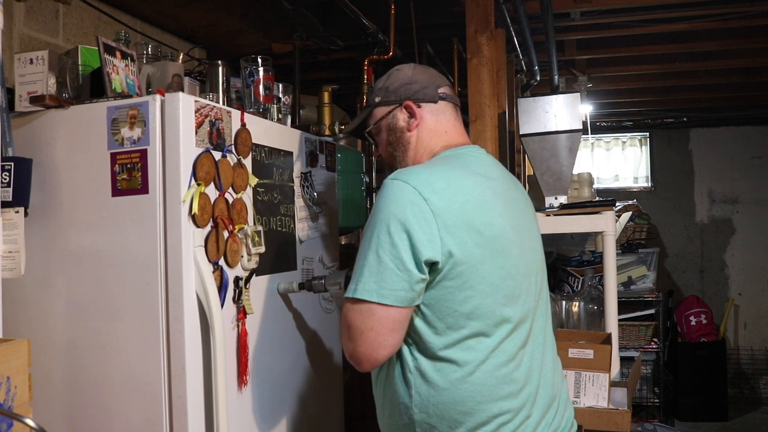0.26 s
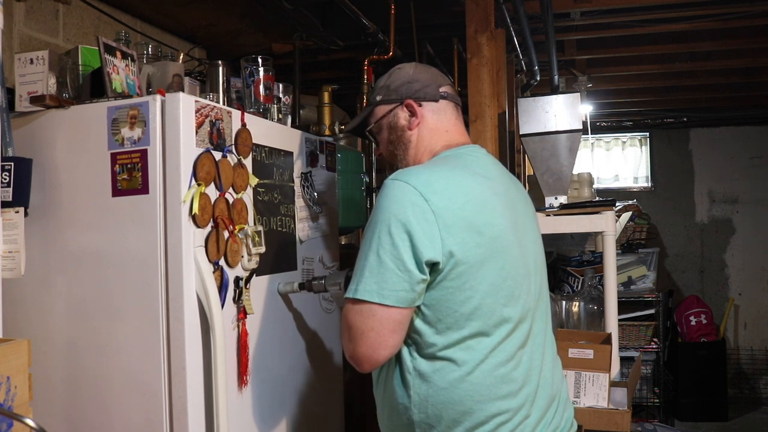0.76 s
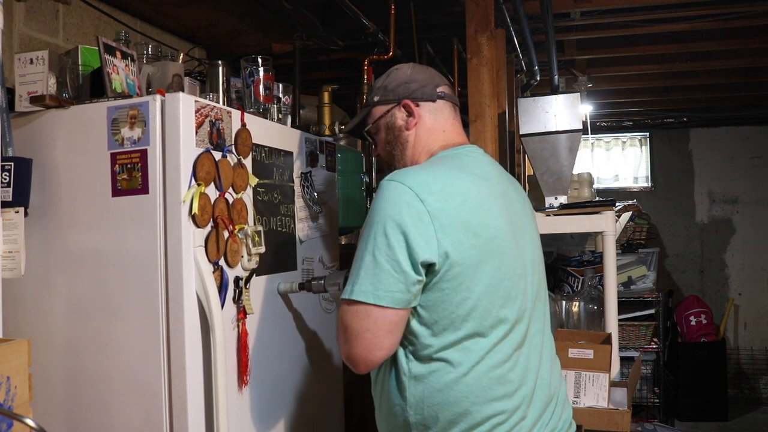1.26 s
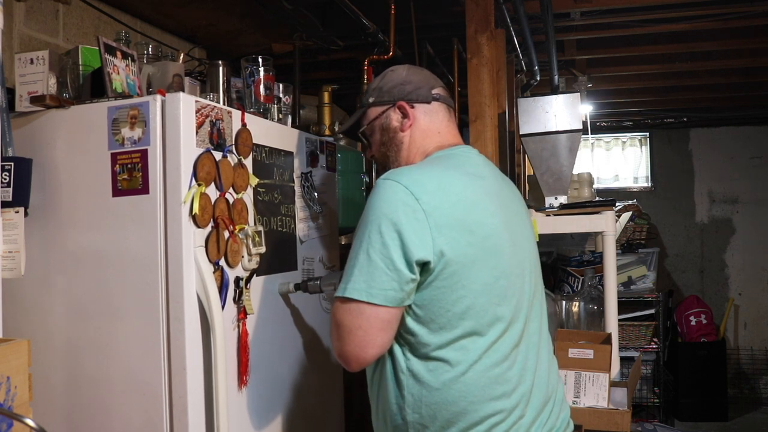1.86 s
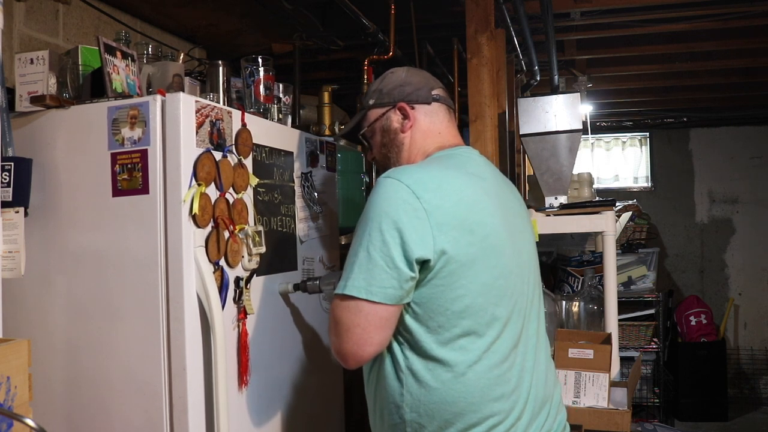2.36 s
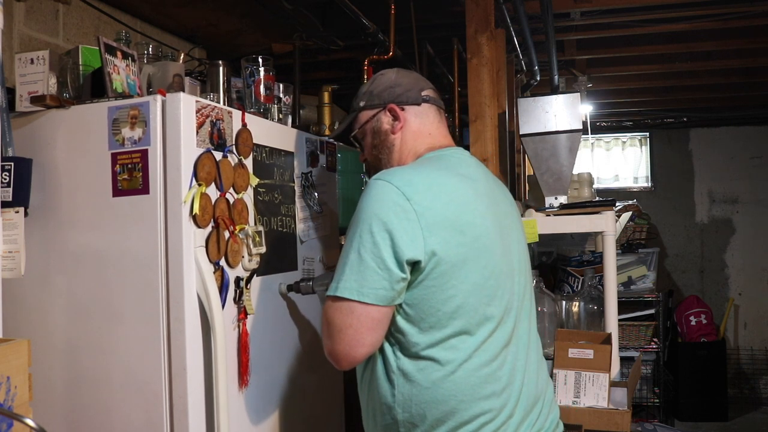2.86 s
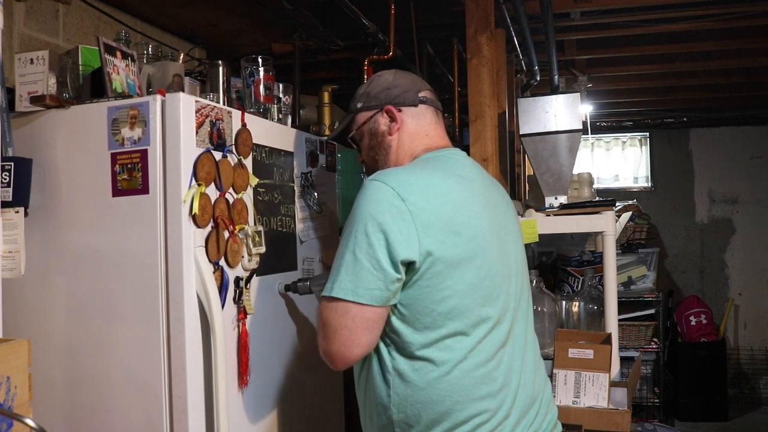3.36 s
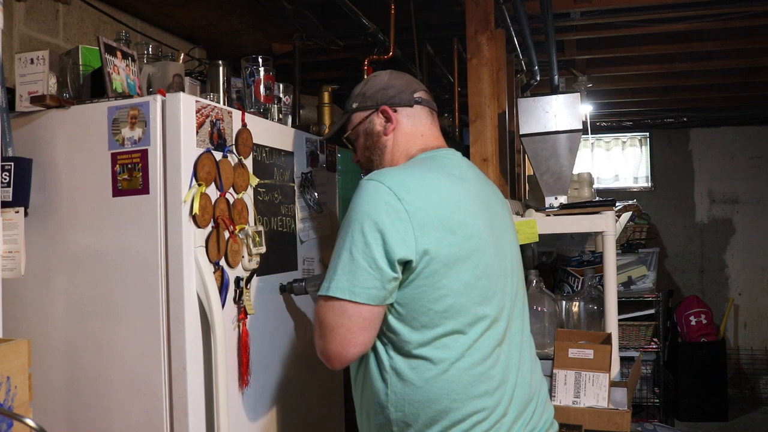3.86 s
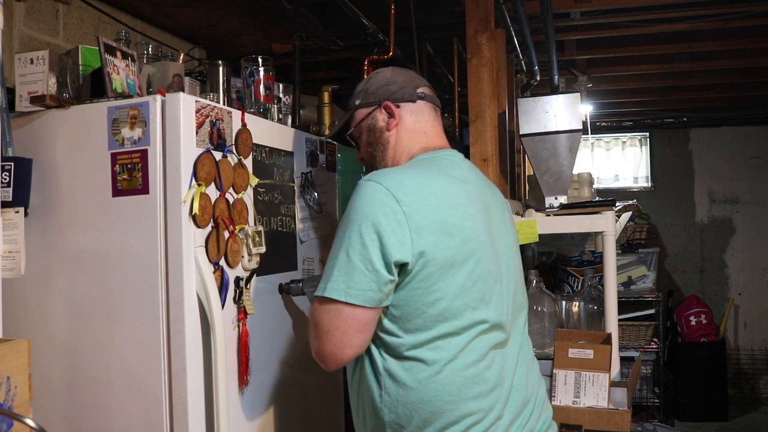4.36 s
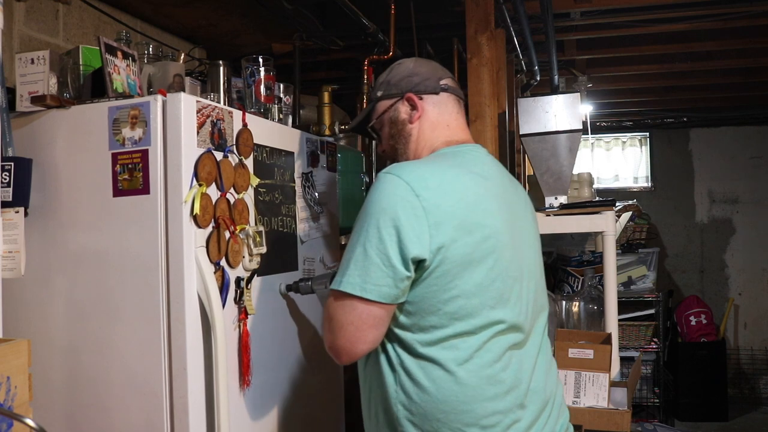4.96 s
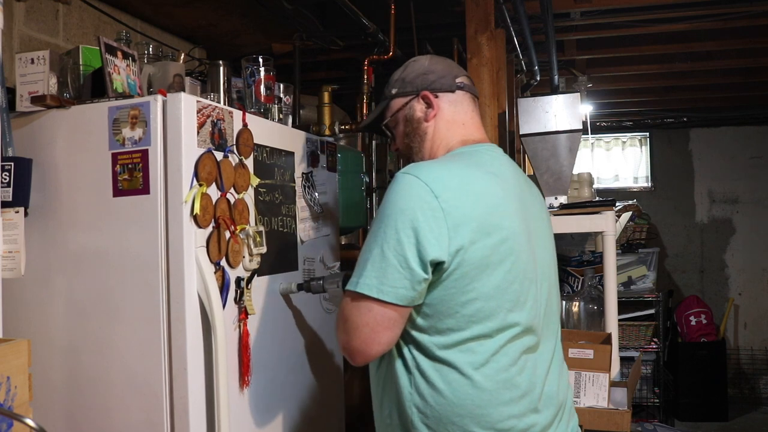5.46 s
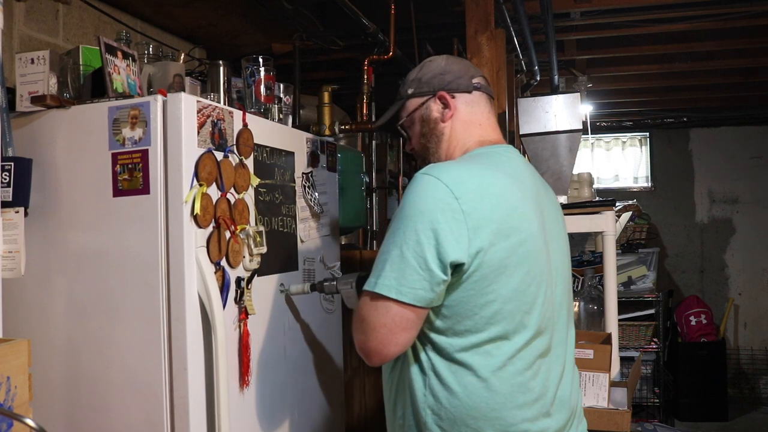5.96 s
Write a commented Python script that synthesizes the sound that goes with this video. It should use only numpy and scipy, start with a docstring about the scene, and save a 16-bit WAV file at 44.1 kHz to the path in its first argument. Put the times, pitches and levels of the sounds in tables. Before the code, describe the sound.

Quiet, dull basement room tone lies under a fairly close mono pickup with a short hard-wall tail. From 0 to 1.75 s a power drill labours on partial trigger: a rough, buzzing whine near 1.6 to 1.8 kHz, unsteady in pitch, with raspy tooth scrape and low cabinet rumble. Small catches knock at 0.6 and 0.9 s. At 1.8 s the pitch sags and the teeth snag with a sharp steel crack and thump. The motor then races up to about 2.6 kHz by 2.4 s, with brief squeals and groans; the door skin rings hollowly and the saw cup sings harshly near 4 to 5 kHz, loudest around 2.2 to 2.7 s. Grinding continues in uneven bites, with bright overtone flares near 3.4 and 3.7 s, then grows lighter. At 5.1 s the trigger releases: a whistling whine glides down, with soft squeaks and a final scraping catch near 5.7 s, fading to 6.2 s.

```python
"""In a basement a power drill pushes a hole saw into the sheet-steel door of a refrigerator.
First the motor, summed from a tone and its overtones, labours until catching teeth jerk the door.
From 1.8 s it speeds up; noise chips ring the door skin and saw cup, which sings, and grind ever lighter.
At 5.1 s the trigger is let go: gliding tones groan and squeak in the groove as the pitch coasts down.
Coloured noise is the room tone; every tool sound gets a short wall tail on its way to the microphone."""
import sys
import numpy as np
from scipy import signal
from scipy.fft import rfft, irfft
from scipy.io import wavfile
from scipy.ndimage import uniform_filter1d, map_coordinates

SR = 44100
rng = np.random.default_rng(int(sys.argv[2]) if len(sys.argv) > 2 else 0)


def persist_wave(psi):
    """Save psi, clipped to +-1, as 16-bit WAV."""
    counts = np.round(np.clip(psi, -1, 1) * 32767).astype(np.int16)
    wavfile.write(sys.argv[1], SR, np.atleast_2d(counts).T)


N = 273417
T = np.arange(N) / SR
TOP_HZ = 15650  # highest pitch that reaches the microphone
RELEASE_S = 5.1  # trigger let go


def undb(db):
    """Decibels to gain."""
    return 10 ** (np.asarray(db) / 20)


def unit(x):
    """Scale to rms 1."""
    return x / np.sqrt(np.mean(x ** 2))


def curves(*tables):
    """Join tables in time and give each column at every sample."""
    s, *columns = np.vstack(tables).T
    return [np.interp(T, s, c) for c in columns]


def swells(table):
    """Smooth bumps from rows (centre s, length s, dB, ..); one level curve per dB column."""
    return sum(np.outer(lifts, np.exp(-(2 * (T - s) / length) ** 2)) for s, length, *lifts in table)


def gain_at(hz, points):
    """Gain of a (Hz, dB) spectrum, straight between points on a log frequency scale."""
    f, db = np.transpose(points)
    return undb(np.interp(np.log(hz + 1), np.log(f), db))


def colour(x, points):
    """Filter by a broad (Hz, dB) spectrum and scale to rms 1."""
    gain = gain_at(np.fft.rfftfreq(N, 1 / SR), points)
    return unit(irfft(rfft(x) * gain, N))


def ring(x, modes):
    """Drive resonances (Hz, width Hz, dB) of alternating sign and scale to rms 1."""
    out = 0
    for k, (hz, width, db) in enumerate(modes):
        mode = signal.lfilter(*signal.iirpeak(hz, hz / width, SR), x)
        out = out + (-1) ** k * undb(db) * mode
    return unit(out)


def walk(rate):
    """Smooth random motion with spread 1, through `rate` random points per second."""
    return unit(map_coordinates(rng.standard_normal(8192), [T * rate], order=2, mode="wrap"))


def catches(rate, decay_s):
    """Random bites that start at once and ease off; mean 0, spread 1."""
    kicks = (rng.random(N) < rate / SR) * rng.random(N)
    force = signal.lfilter([1], [1, -np.exp(-1 / (decay_s * SR))], kicks)
    return unit(force - force.mean())


def waver(x, share, rate):
    """Bend the pitch of a ring at random, by a share of its frequency."""
    bend = share * walk(rate)
    lag = signal.lfilter([1], [1, -np.exp(-1 / SR)], bend)
    return map_coordinates(x, [T * SR + lag], order=3, mode="mirror")


def basement(x, wet_db):
    """Direct sound and a short diffuse tail from the walls; the treble dies first."""
    t60_s, treble_t60_s = 0.31, 0.22
    t = T[:SR // 2]
    noise = rng.standard_normal(len(t))
    low = signal.sosfilt(signal.butter(2, 3500, fs=SR, output="sos"), noise)
    tail = low * undb(-60 * t / t60_s) + (noise - low) * undb(-60 * t / treble_t60_s)
    tail *= t > .003  # the walls answer after 3 ms
    wet = signal.fftconvolve(x, tail / np.linalg.norm(tail))[:N]
    return (x + undb(wet_db) * wet) / np.hypot(1, undb(wet_db))


# Steady background of the basement. Each row: frequency in Hz, relative level in dB.
ROOM_TONE_SPECTRUM = [(25, -57), (160, -25), (195, -25), (235, -0.5), (310, -9), (400, 4), (560, -0.5),
                      (620, 1.5), (665, 12), (740, -1.5), (1200, -4), (2400, -2.5), (4000, -7),
                      (15000, -30)]


def room_tone():
    """Coloured noise of the basement air, its level wandering slowly."""
    level_db = -55 + 0.99 * walk(7.3)
    return undb(level_db) * colour(rng.standard_normal(N), ROOM_TONE_SPECTRUM)


# Stick-slip squeals at the door. Each row: start in seconds, length in seconds until the fade,
# start pitch in Hz, end pitch in Hz, relative level in dB, overtone slope in dB per octave,
# roughness (0 pure, 1 ragged, 2 a scrape).
GROOVE_SQUEALS = [(0.622, 0.017, 2220, 2190, -41, -24, 0.87), (1.935, 0.027, 2085, 2152, -29, -14, 0.3),
                  (1.962, 0.077, 671, 668, -39, -39, 1.3), (2.105, 0.036, 682, 735, -36.5, -29, 1.13),
                  (2.172, 0.07, 696.5, 693, -39, -29, 0.9), (2.17, 0.068, 2730, 2654, -40.5, -25, 0.49),
                  (2.24, 0.13, 970, 1100, -39.5, -11, 2.05), (2.324, 0.026, 4114, 3994, -45, -25, 0.38),
                  (2.345, 0.02, 4670, 4800, -35, -25, 0.2), (2.483, 0.03, 7030, 7100, -49, -25, 0.1),
                  (3.42, 0.46, 2150, 2170, -54.5, -28, 0.29), (4.065, 0.1, 803, 836.5, -42.5, -26, 1.02),
                  (4.705, 0.027, 2663, 2710, -40.5, -14, 0.2), (5.17, 0.12, 1553, 1540, -55.5, -25, 1.7),
                  (5.304, 0.0407, 1122, 1086, -47.5, -32, 0.74), (5.452, 0.03, 642, 667, -50, -32, 0.7),
                  (5.53, 0.035, 682, 667, -51.5, -32, 0.68), (5.563, 0.049, 674.4, 645, -42, -37, 0.75),
                  (5.66, 0.019, 2057, 2002, -38, -11, 0.62), (5.682, 0.0053, 2168, 2197, -41, -5, 0.37),
                  (5.692, 0.0064, 2010, 2032, -36.5, -11, 0.29), (5.68, 0.028, 2016, 1983, -49, -1.5, 0.25)]


def squeals(build_cycles=3, flutter_db=4):
    """The saw wall sticks and slips in its groove: gliding tones whose pitch and level turn ragged."""
    wander_share = 0.045  # pitch wander at roughness 1
    out = np.zeros(N)
    for s, length, start_hz, end_hz, db, step_db, rough in GROOVE_SQUEALS:
        # a resonance needs a few cycles to build up and to die, so low squeals start softly
        edge = build_cycles / start_hz
        span = (T > s) & (T < s + length + edge)
        t = T[span] - s
        glide_hz = np.interp(t, [0, length], [start_hz, end_hz])
        hz = glide_hz * (1 + wander_share * rough * walk(500)[span])
        phase = 2 * np.pi * np.cumsum(hz) / SR
        harmonics = [k for k in range(1, 7) if k * start_hz < TOP_HZ]
        tone = sum(undb(step_db * np.log2(k)) * np.sin(k * phase) for k in harmonics)
        flutter = undb(flutter_db * rough * np.tanh(walk(170)[span]))
        gate = np.clip(np.minimum(t, length + edge - t) / edge, 0, 1)
        out[span] += undb(db) * gate * unit(tone * flutter)
    return out


# Teeth catching the steel. Each row: start in seconds, relative thump level in dB,
# relative crack level in dB, time to fall by 60 dB in seconds.
TOOTH_SNAGS = [(0.622, -44.5, -57, 0.082), (0.91, -49, -50, 0.1), (1.784, -36.5, -53, 0.15),
               (1.789, -42, -25, 0.032), (1.806, -44, -41, 0.079), (5.445, -61, -59, 0.14),
               (5.675, -64, -51, 0.16)]


def snags():
    """A caught tooth jerks the door: a crack from the steel and a thump from the cabinet."""
    thump, crack = np.zeros(N), np.zeros(N)
    for s, thump_db, crack_db, decay in TOOTH_SNAGS:
        attack = np.clip((T - s) / 0.00056, 0, 1)
        fade = attack * np.exp(-np.log(1000) * np.abs(T - s) / decay)
        thump += undb(thump_db) * fade
        crack += undb(crack_db) * fade
    cabinet_modes = [(118, 67, -2.0), (164, 14, 11.5), (285.0, 230, 11.0)]
    steel_modes = [(1300.0, 31, 20.0), (2640, 190, 17), (5870, 140, 10),
                   (6760, 53, 8), (10900, 2000, -12.5)]
    low = ring(rng.standard_normal(N), cabinet_modes)
    high = ring(rng.standard_normal(N), steel_modes)
    return thump * low + crack * high


def teeth(hz, wobble_db, bite_db, catch_db, grain_db):
    """Tiny chips tear off in a dense crackle that pulses with the uneven rim and the passing teeth."""
    phase = 2 * np.pi * np.cumsum(hz) / SR
    rim = np.sin(phase / 70 + walk(10)) + np.sin(phase / 35 + walk(10))
    passing = np.sin(phase / 7 + walk(25))
    caught = np.minimum(catches(110, 0.033), 2.5)
    force_db = wobble_db * rim + bite_db * passing + catch_db * caught
    return rng.standard_normal(N) * undb(force_db + grain_db * rng.standard_normal(N))


# The saw judders with the catching teeth, harder the more the door rings.
# Each row: door ring in dB as given to the saw, judder in dB per unit of catching force.
JUDDER_DEPTH = [(-58.5, 0.6), (-45, 2.0)]


def judder(door_db):
    """Level jolts in dB as the whole saw judders with its catching teeth."""
    return np.interp(door_db, *np.transpose(JUDDER_DEPTH)) * np.minimum(catches(60, 0.013), 2.2)


# Resonances of the door skin. Each row: frequency in Hz, width in Hz, relative level in dB.
DOOR_MODES = [(379, 31, -7.5), (474, 34, -5), (656, 200, -5.5), (760, 62, 2.5), (805, 28.3, 7.5),
              (850, 55, 4), (952, 68, 1), (1079.4, 66, 3.5)]


def door_ring(hz):
    """The teeth drive the resonances of the door skin."""
    door = ring(teeth(hz, wobble_db=1.0, bite_db=-1.0, catch_db=0.33, grain_db=1.5), DOOR_MODES)
    return colour(door, [(100, -7), (350, 1.0), (1120, 1.0), (1500, 13.5), (5000, -49)])


# Broad colour of the tooth scrape. Each row: frequency in Hz, relative level in dB.
SCRAPE_SPECTRUM = [(300, -38), (900, -22), (1350, 0), (2200, 6), (3300, 3), (4500, 3), (6200, 2),
                   (8000, -9.5), (9300, -15), (10800, -26), (13000, -15.5), (15500, -76)]
# Resonances of the saw cup. Each row: frequency in Hz, width in Hz, relative level in dB.
CUP_RESONANCES = [(2126, 29, 5.5), (2680, 55, 18.5), (4190, 630, -10.5), (4490, 270, 12), (5400, 2200, -21),
                  (6900, 62, -19), (10200, 993, 0), (11550, 930, -1)]


def tooth_scrape(chips):
    """Chips hiss over a broad band, ring the saw cup and drag."""
    # the cup rings most while the whole rim is in the steel
    rim_db = np.interp(T, [1.8, 2.2, 5.8], [-3, 7.5, 5])
    # at low speed the teeth drag instead of cutting, with a duller rasp
    drag_db = np.interp(T, [1.6, 2.2], [5, -12])
    hiss = undb(9.0) * colour(chips, SCRAPE_SPECTRUM)
    cup = undb(rim_db) * ring(chips, CUP_RESONANCES)
    drag = undb(drag_db) * ring(chips, [(2227, 87, 0)])
    return hiss + cup + drag


def singing_gain():
    """The cup sings as the rim first sinks in: attack, hold, a quick drop and a slow fade."""
    start_s, attack_s, end_s, release_s = 1.97, 0.11, 2.67, 0.037
    level_db, drop_db, fade_db_per_s = -45, -4, 11.5
    after = np.maximum(T - end_s, 0)
    db = level_db + drop_db * np.minimum(after / release_s, 1) - fade_db_per_s * after
    return np.clip((T - start_s) / attack_s, 0, 1) * undb(db)


# Sharp modes of the singing saw cup. Each row: frequency in Hz, width in Hz, relative level in dB.
SINGING_MODES = [(4146, 134, -3.5), (4660, 78, 5), (4758, 53, 1.5)]


def cup_singing(chips, sing_db):
    """The rim grabs and slips: the cup sings in gritty bursts, bent in pitch by the grip."""
    grip = unit(undb(5.5 * np.minimum(walk(75), 1.2)))
    tone = waver(ring(chips, SINGING_MODES), share=0.01102, rate=55)
    return singing_gain() * undb(sing_db) * grip * tone


# Broad colour of the cabinet rumble. Each row: frequency in Hz, relative level in dB.
RUMBLE_SPECTRUM = [(25, -52), (45, -30), (75, -8), (120, -3), (160, 4), (230, 8.5), (330, -0.5),
                   (450, -1.5), (700, 4), (1500, -52)]


def cabinet_rumble(hz):
    """The teeth shake the cabinet in low, strongly pulsing noise."""
    shaking = teeth(hz, wobble_db=-4.0, bite_db=-12.0, catch_db=3.5, grain_db=2.5)
    return colour(shaking, RUMBLE_SPECTRUM)


def saw(hz, door_db, scrape_db, rumble_db, sing_db):
    """The teeth ring the door skin and the saw cup, and shake the cabinet."""
    judder_db = judder(door_db)
    chips = teeth(hz, wobble_db=0.63, bite_db=4.0, catch_db=1.04, grain_db=1.5)
    door = undb(door_db - 2.0 + judder_db) * door_ring(hz)
    scrape = undb(scrape_db + 0.063 * judder_db) * tooth_scrape(chips)
    rumble = undb(rumble_db - 1.0) * cabinet_rumble(hz)
    return door + scrape + cup_singing(chips, sing_db) + rumble


# Colour the drill housing gives the overtones. Each row: frequency in Hz, relative level in dB.
HOUSING_SPECTRUM = [(3000, -8), (4900, 1), (6800, 2.5), (8500, -3), (10200, -5), (11700, -16),
                    (13500, -19.5), (15500, -31)]


def overtones(phase, hz, upper_db, rough):
    """Overtones 3 to 12 flutter in short beads, as when a moving tone meets echoes in a room."""
    bead_db, bead_rate = 6, 95  # depth in dB per unit of walk, random points per second
    # odd overtones sound mainly in the slow, labouring run
    odd_db = np.interp(T, [1.78, 1.9], [0, -13])
    # coasting unloaded, the high overtones whistle downward, coming and going
    coasting = np.clip(T - RELEASE_S, 0, 1)
    high = 0
    for k in range(3, 13):
        size = gain_at(k * hz, HOUSING_SPECTRUM) * (k * hz < TOP_HZ)
        flutter = uniform_filter1d(np.minimum(catches(90, 0.0039), 2.2), size=30)
        db = upper_db - 6.5 + k % 2 * odd_db
        db = db + bead_db * np.minimum(walk(bead_rate), 1) + 2.83 * flutter
        db = db + coasting * (np.interp(k, [4, 6], [-10, 2]) + 5 * np.tanh(walk(16)))
        high = high + undb(db) * size * np.sin(k * phase + 1.7 * rough * walk(170))
    return high


# Rasp of the gears. Each row: frequency in Hz, relative level in dB.
RASP_SPECTRUM = [(3000, -19), (7500, -0.5), (9300, -13), (12800, -4), (14500, -20)]


def gear_rasp(upper_db, rough):
    """The loaded gears also rasp: noise that fills the gaps between the overtones."""
    db = upper_db - 16.5 + 2 * np.minimum(catches(110, 0.013), 2)
    return rough * undb(db) * colour(rng.standard_normal(N), RASP_SPECTRUM)


def whine(hz, first_db, octave_db, upper_db, rough):
    """Motor and gear tones; the load sways their speed once a turn and rattles them."""
    turn = np.cumsum(hz) / SR / 48  # 48 whine cycles a turn
    sway = 0.0064 * np.sin(2 * np.pi * turn + walk(9.96))
    speed = hz * (1 + rough * (0.00493 * walk(200) + sway))
    # play in the gears shakes the phase, which frays the high overtones most
    phase = 2 * np.pi * np.cumsum(speed) / SR + 0.047 * rough * walk(800)
    first_db = first_db + 3.0 * rough * np.minimum(walk(110), 1.2)
    octave_db = octave_db + 6 * np.minimum(walk(47.5), 1) - 2.0
    low = undb(first_db) * np.sin(phase)
    low += undb(octave_db) * np.sin(2 * phase + 1.12 * rough * walk(260))
    high = overtones(phase, hz, upper_db, rough) + gear_rasp(upper_db, rough)
    shake = np.sqrt(2) * (1 + undb(-15) * walk(600))
    # the overtones beam off to the sides, so they reach the microphone largely by the walls
    return basement(low * shake, wet_db=-9.0) + basement(high * shake, wet_db=-2.0)


# Resonances and dips of the drill that colour the two lowest tones as they pass through.
# Each row: frequency in Hz, half width in Hz, lift in dB.
DRILL_RESONANCES = [(1675, 76, 9.5), (1833, 66, 13), (1972, 127, 17.5), (2263, 90, 14.5), (2683, 70, -17),
                    (3158, 28, 9.5), (3292, 71, 8), (3545, 75, 11), (3813, 242, -25), (5030, 540, 6)]


def drill_tone_db(tone_hz):
    """Level offset of one low tone: the drill's resonances and uneven bursts."""
    lift_db = sum(db * np.exp(-((tone_hz - f) / width) ** 2) for f, width, db in DRILL_RESONANCES)
    return -5.5 + 2.6 * walk(40) + lift_db


# Motor labouring on a half-pulled trigger until the saw snags.
# Each row: time in seconds, whine pitch in Hz.
SLOW_RUN = [(0, 1671), (0.14, 1716), (0.25, 1584), (0.42, 1642), (0.47, 1612), (0.65, 1809), (0.75, 1803),
            (0.775, 1746), (0.91, 1743), (0.93, 1697), (1.065, 1704), (1.09, 1651), (1.22, 1695),
            (1.26, 1658), (1.38, 1700), (1.545, 1667), (1.68, 1570), (1.76, 1558), (1.79, 1440)]
# Motor on full trigger. Each row: time in seconds, whine pitch in Hz, relative whine level in dB.
FAST_RUN = [(1.805, 1425, -79), (1.86, 1841, -47), (1.93, 2090, -46.5), (2.06, 2358, -43.5),
            (2.2, 2400, -49), (2.34, 2560, -44), (2.49, 2596, -33), (2.59, 2575, -45.5), (2.8, 2621, -36),
            (3.04, 2640, -44), (3.24, 2636, -48.5), (3.42, 2594, -46), (3.53, 2520, -44.5),
            (3.66, 2474, -43.5), (3.8, 2505, -55.5), (3.9, 2549, -59), (4.07, 2677, -57.5),
            (4.35, 2673, -52), (4.65, 2667, -55.5), (4.85, 2658, -59), (5.1, 2755, -77)]
# The overtones flare up at full speed. Each row: centre in seconds, length in seconds, lift in dB.
OVERTONE_FLARES = [(2.47, 0.29, 15), (3.36, 0.29, 17.5), (3.7, 0.18, 19.5)]
# Level of the two lowest tones over time, added to the drill's colour. Each row: centre in seconds,
# length in seconds, fundamental lift in dB, octave lift in dB.
TONE_LEVELS = [(0.155, 0.05, -7, 10), (0.715, 0.041, 1.5, 2), (0.85, 0.1, -6.5, 3), (1.09, 0.15, -3, 1),
               (1.25, 0.025, -2.5, -0.5), (1.59, 0.039, -4, -1), (1.69, 0.16, -11, 0), (1.77, 0.056, 2, 5),
               (1.915, 0.036, -6, 8), (2.595, 0.042, -16, -6), (2.675, 0.068, 11.5, -1),
               (2.735, 0.065, 3, -14), (3.2, 0.075, -15, 12), (3.38, 0.079, 9, 3), (3.585, 0.061, -12, -17),
               (3.655, .05, -13, 10), (3.765, 0.022, 16.5, 4), (4.2, 0.16, 26, -4), (4.62, 0.16, 21, 4.5)]


def drill(scrape_db):
    """Speed and whine: a slow labouring run, a cleaner run at full speed, then coasting."""
    slow_whine_db = -36.5
    hz, level_db = curves([(s, pitch, slow_whine_db) for s, pitch in SLOW_RUN], FAST_RUN)
    # let go, the speed dies away from 2700 Hz with a time constant of 1.235 s
    coasted = np.maximum(T - RELEASE_S, 0)
    hz = np.where(T < RELEASE_S, hz, 2700 * np.exp(-coasted / 1.235))
    fast = np.interp(T, [SLOW_RUN[-1][0], FAST_RUN[1][0]], [0, 1])
    # unloaded, the high whistle takes over within 0.71 s
    driven = np.maximum(1 - coasted / 0.71, 0)
    first_lift, octave_lift = swells(TONE_LEVELS)
    first_db = level_db + drill_tone_db(hz) + first_lift
    octave_db = level_db + drill_tone_db(2 * hz) + octave_lift
    upper_db = level_db - 1 - 16 * fast * driven + 14 * (1 - driven) + swells(OVERTONE_FLARES)[0]
    # roughness grows in step with the scrape: 0.72 slow and 0.17 fast at a scrape of -54 dB
    rough = np.clip((0.72 * (1 - fast) + 0.17 * fast) * undb(scrape_db + 54), 0, 1)
    return hz, whine(hz, first_db, octave_db, upper_db, rough)


# Progress of the cut. Each row: time in seconds, then relative levels in dB of
# door ring, tooth scrape and cabinet rumble.
CUT_PROGRESS = [(0, -63, -52, -61.5), (0.45, -61.5, -51, -57.5), (0.7, -63.5, -58.5, -60),
                (1.6, -62, -57, -62), (1.85, -60, -53.5, -56.5), (1.98, -43.5, -54.5, -64),
                (2.48, -38, -51, -64), (3.7, -49, -55.5, -64.5), (3.92, -50, -58, -75),
                (4.25, -44, -54.5, -74), (4.75, -52, -56.5, -75), (5.0, -53.5, -61.5, -83),
                (5.38, -51.5, -62.5, -79), (5.7, -56, -62.5, -53), (5.86, -60.5, -72, -87),
                (6.2, -92, -75, -85)]
# The saw is leaned on and bites deeper, or eases off. Each row: centre in seconds,
# length in seconds, door lift in dB, scrape lift in dB, cup singing lift in dB.
SAW_BITES = [(2.26, 0.031, -1, -0.5, 6), (2.35, 0.071, 1, 3.5, 8.5), (2.43, 0.044, 5.5, 6.5, 8),
             (2.49, 0.036, 3, 3.5, 6), (2.6, 0.17, -4, -0.5, -2), (2.81, 0.02, 7.5, 4, -6),
             (2.9, 0.11, 3, 0.5, 4.5), (3.12, 0.15, 2, -0.5, 7), (3.22, 0.099, 4.5, 0, 5),
             (5.69, 0.039, 5, 10.5, 0)]


def scene():
    """One motor speed drives both the whine and the teeth."""
    door_db, scrape_db, rumble_db = curves(CUT_PROGRESS)
    door_lift, scrape_lift, sing_lift = swells(SAW_BITES)
    door_db, scrape_db = door_db + door_lift, scrape_db + scrape_lift
    hz, motor = drill(scrape_db)
    cutting = basement(saw(hz, door_db, scrape_db, rumble_db, sing_lift), wet_db=-5.5)
    catching = basement(snags() + squeals(), wet_db=-8.0)
    return (room_tone() + catching + cutting + motor)[None]


def record(dry):
    """The microphone loses the deep bass below 55 Hz and everything above TOP_HZ."""
    dry = signal.sosfilt(signal.butter(3, 55, "high", fs=SR, output="sos"), dry)
    return signal.sosfilt(signal.ellip(10, .2, 80, TOP_HZ, fs=SR, output="sos"), dry)


dry = scene()
out = record(dry)
persist_wave(out)
```